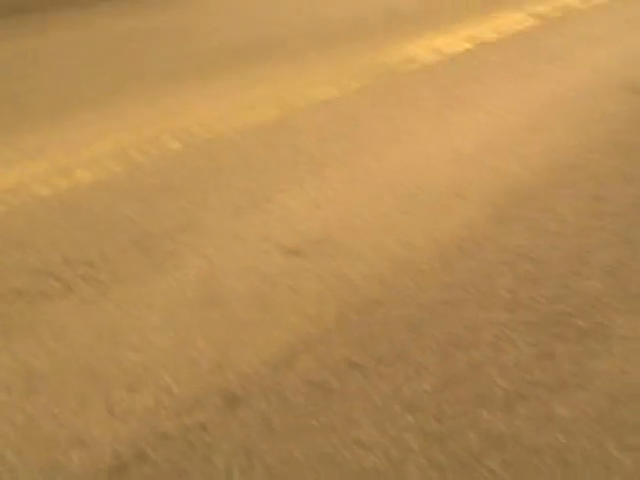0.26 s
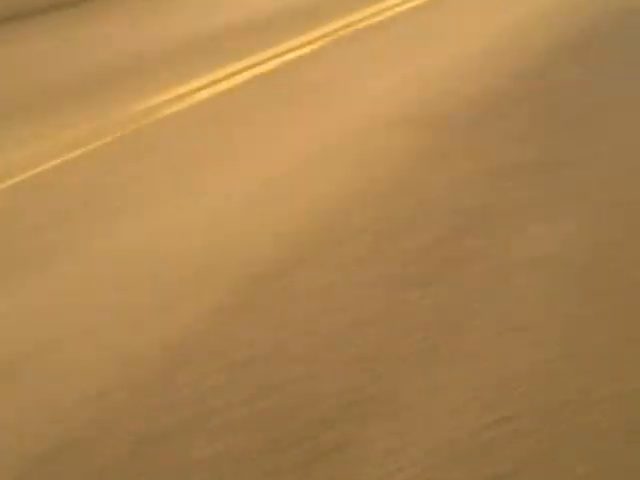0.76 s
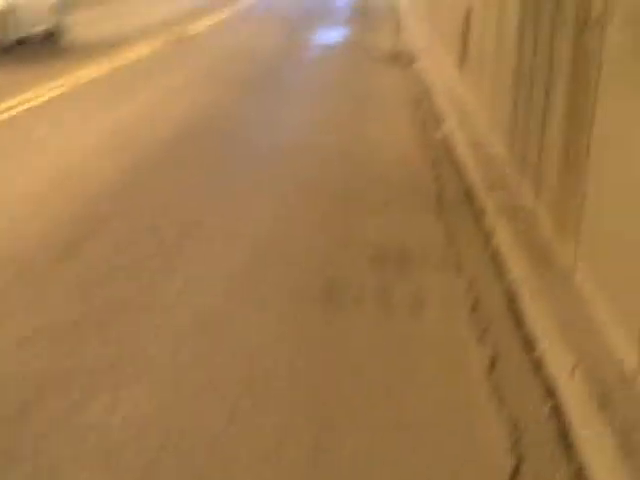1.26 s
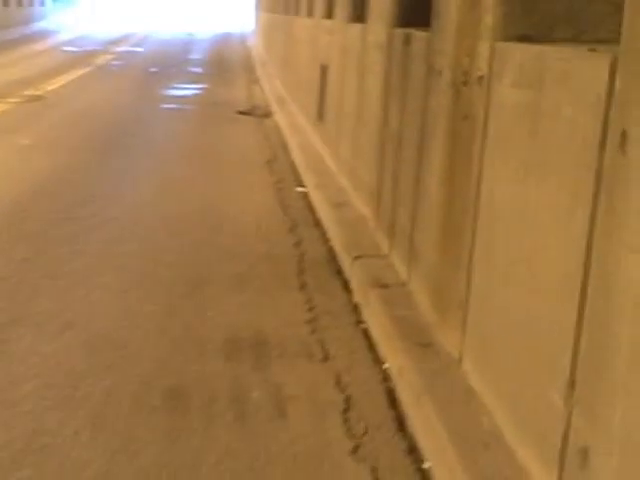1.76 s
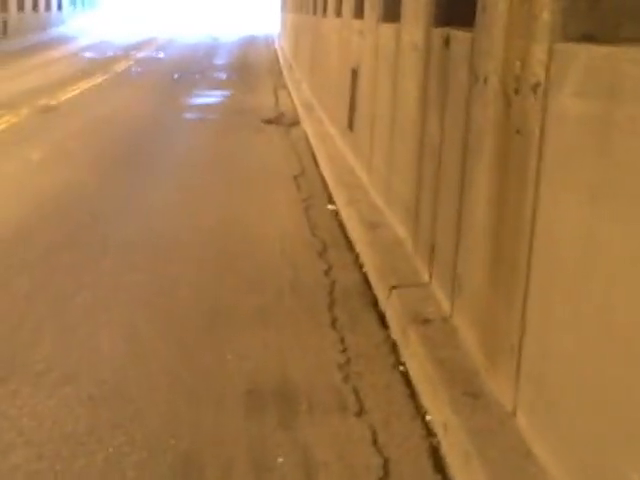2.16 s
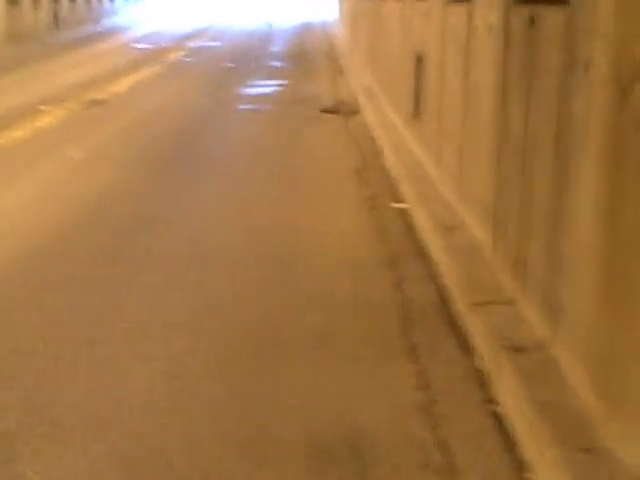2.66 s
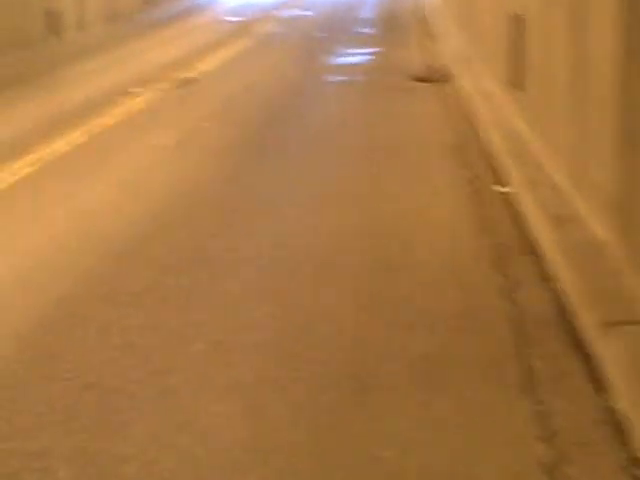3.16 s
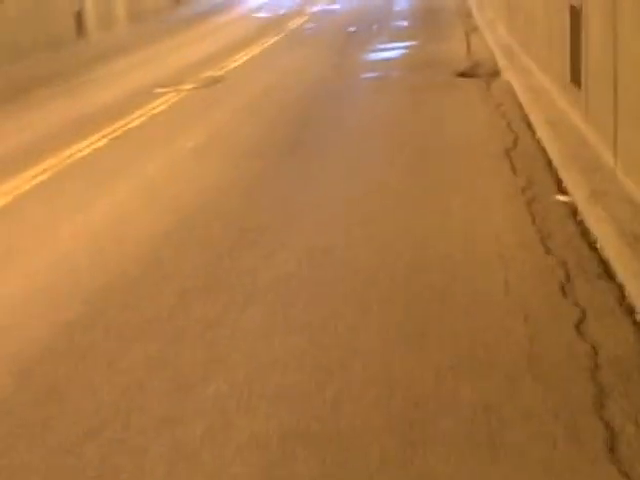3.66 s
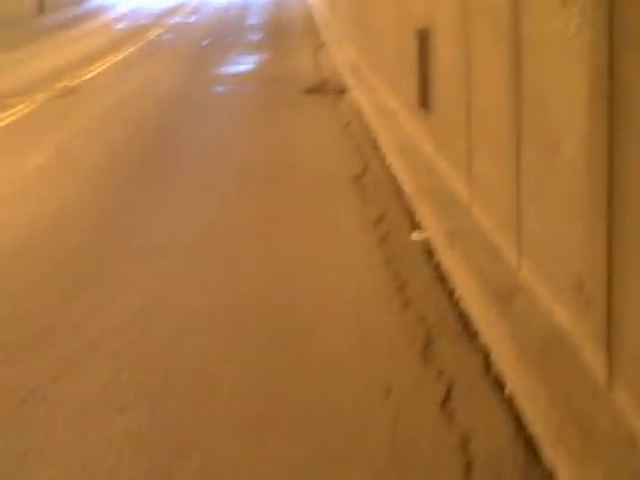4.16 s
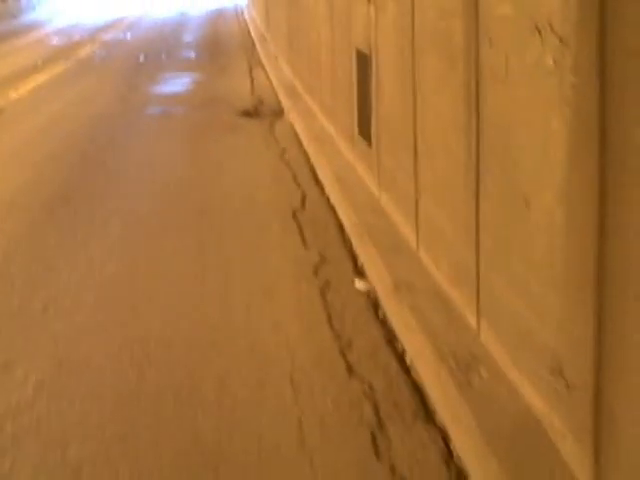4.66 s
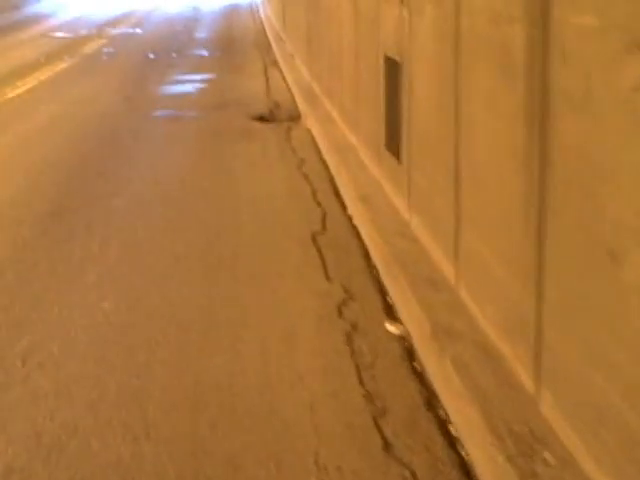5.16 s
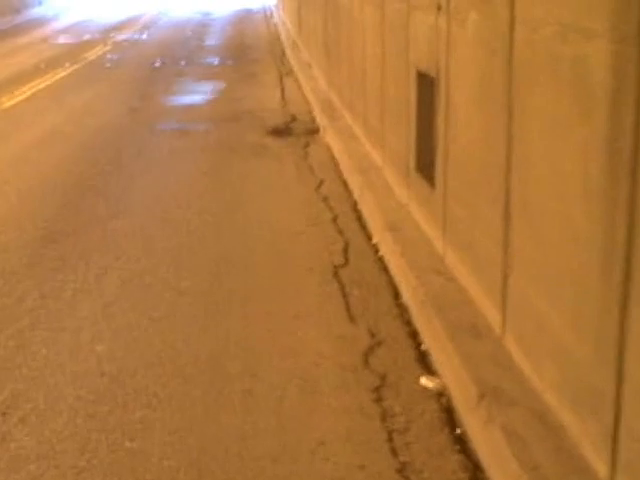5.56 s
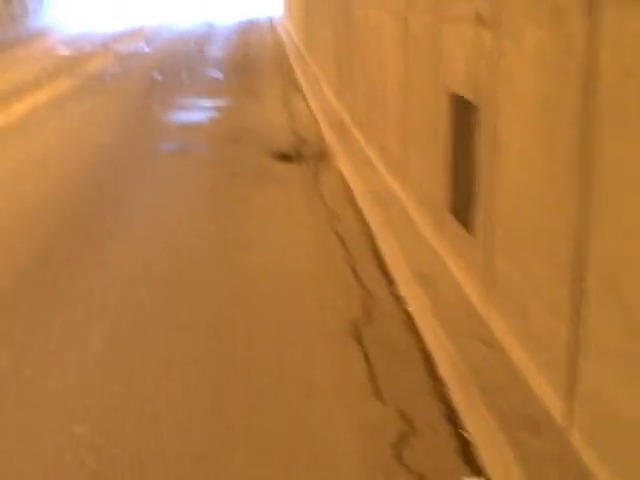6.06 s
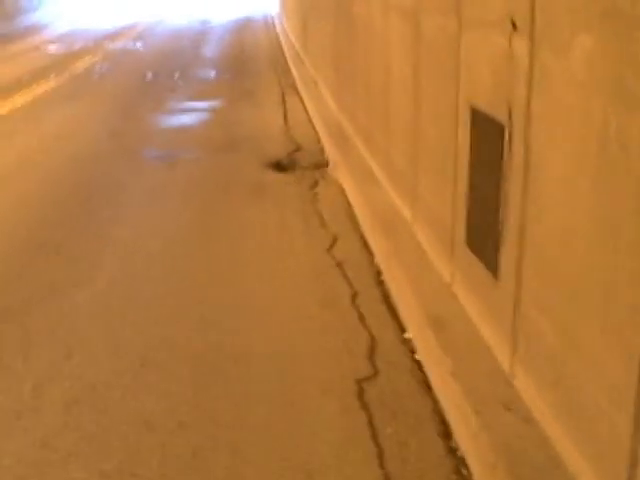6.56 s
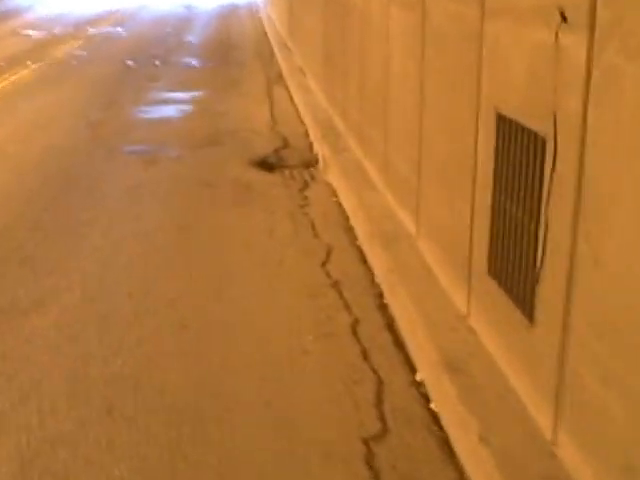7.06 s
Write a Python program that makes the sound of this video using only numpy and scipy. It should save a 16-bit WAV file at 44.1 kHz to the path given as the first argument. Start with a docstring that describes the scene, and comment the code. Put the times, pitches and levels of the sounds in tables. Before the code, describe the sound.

Continuous road traffic heard from the edge of a tunnel lane by a small handheld camera. Broad tyre noise with a bright hiss peaks early, over throbbing low engines and a booming bore. It softens through the middle, with tiny close clicks and a barely audible high whine, then builds again as another vehicle draws near.

```python
"""Tyres roar and engines rumble, blurred by echo: traffic in a concrete tunnel, heard from the kerb by a camera.
A car hisses past at about 2 s, the rush eases, and more traffic draws near; a few dry ticks sound close by.
Tyres are shaped noise that swells as traffic passes, plus bands of noise around moving pitches.
Engines are wavering harmonics over noise; an exhaust drone and the tunnel's deep boom throb; the camera whines."""
import sys
import numpy as np
from scipy import signal
from scipy.fft import rfft, irfft
from scipy.io import wavfile

SR = 44100
rng = np.random.default_rng(int(sys.argv[2]) if len(sys.argv) > 2 else 0)


def store_wav(level_fs):
    """Save 16-bit WAV to argv[1]."""
    pcm = np.round(np.clip(np.atleast_2d(level_fs), -1, 1) * 32767)
    wavfile.write(sys.argv[1], SR, pcm.T.astype(np.int16))


N = 321840
TIME = np.arange(N) / SR  # s
FREQ = np.maximum(np.fft.rfftfreq(N, 1 / SR), 1)  # Hz, kept off zero for the logarithms


def undb(db):
    """Decibels to gain."""
    return 10 ** (np.asarray(db) / 20)


def unit(x):
    """Scale to an rms of one."""
    return x / np.sqrt(np.mean(x ** 2))


def noise():
    """White noise."""
    return rng.standard_normal(N)


def tone(hz):
    """Phase in radians of a moving pitch."""
    return 2 * np.pi * np.cumsum(hz) / SR


def curves(table):
    """Each column after the first, joined by straight lines in time."""
    s, *columns = np.transpose(table)
    return [np.interp(TIME, s, column) for column in columns]


def colour(x, points):
    """Filter by (Hz, relative dB) points, straight on a log frequency axis, to unit rms."""
    hz, db = np.transpose(points)
    gain_db = np.interp(np.log(FREQ), np.log(hz), db)
    return unit(irfft(rfft(x) * undb(gain_db), N))


def resonate(x, hz, width_hz):
    """One resonance, gain one at its centre."""
    detuning = (FREQ ** 2 - hz ** 2) / (FREQ * width_hz)
    return irfft(rfft(x) / (1 + 1j * detuning), N)


def walk(rate_hz):
    """Smooth random drift of unit rms, its spectrum a Gaussian falling from zero."""
    moving_hz = FREQ[FREQ < 3 * rate_hz]
    real, imag = rng.standard_normal((4096, 2)).T
    size = min(len(moving_hz), len(real))
    fall = np.exp(-(moving_hz[:size] / rate_hz) ** 2)
    return unit(irfft((real + 1j * imag)[:size] * fall, N))


def impacts(per_s, spread_db):
    """Random tiny impacts, a few much harder than the rest."""
    size = undb(spread_db * np.minimum(rng.exponential(size=N), 5))
    hits = rng.random(N) < per_s / SR
    return unit(hits * size * noise())


def hum(hz, spread_hz):
    """A note smeared into a band around a moving pitch, as from many wheels at once."""
    phase = tone(hz)
    return unit(walk(spread_hz) * np.cos(phase) + walk(spread_hz) * np.sin(phase))


# Camera whine. Each row: pitch in Hz, level in dB.
WHINE_TONES = [(7640, -64), (7598, -70)]


def whine():
    """Thin, slightly unsteady sine tones of the camera."""
    waver_hz, waver_rate_hz = 4.5, 17
    out = np.zeros(N)
    for hz, db in WHINE_TONES:
        out += undb(db) * unit(np.sin(tone(hz + waver_hz * walk(waver_rate_hz))))
    return out


# Close ticks. Each row: start in s, level in dB, snap pitch in Hz, knock against snap in dB, decay in s.
TICK_EVENTS = [(3.1035, -26.5, 6300, 1, .0024), (3.107, -33, 6200, 3, .002), (3.1785, -30.5, 6900, 1, .003),
               (3.1815, -35, 6700, 4, .002), (4.839, -37, 7000, -6, .002), (4.856, -38, 6350, 0, .003),
               (5.402, -30, 6400, -12, .0028), (5.667, -37, 6300, 2, .01), (6.178, -37, 6600, -6, .009),
               (6.417, -30.5, 6500, -3, .003)]
TICK_WIDTH_HZ = 1400


def ticks():
    """Dry ticks near the microphone: a resonant noise snap over a lower knock, decaying in milliseconds."""
    out = np.zeros(N)
    crack = colour(noise(), [(3000, -6), (6000, 3), (7200, -1.5), (8000, -14.5)])
    knock = colour(noise(), [(1200, -20.5), (3000, -2), (4300, 6), (5500, -1.5), (7500, -18)])
    for s, db, hz, knock_db, decay_s in TICK_EVENTS:
        decay = np.exp(-np.minimum(np.abs(TIME - s) / decay_s, 20))
        snap = unit(resonate(crack, hz, TICK_WIDTH_HZ))
        out += (TIME >= s) * decay * undb(db) * (snap + undb(knock_db) * knock)
    return out


def motor(hz):
    """Harmonics 2 to 8 of one car's engine; each fades in and out among the wall reflections."""
    phase = tone(hz * (1 + .05 * walk(0.81) + 0.01544 * walk(9.6)))
    return unit(sum(walk(3.3) * np.sin(k * phase) for k in range(2, 9)))


# Engine rumble, surging and sagging as cars roll by.
# Each row: time in s, level of the deep part in dB, level of the engine notes and their rumble in dB.
RUMBLE_LEVEL = [(0, -29, -24.5), (.35, -27.5, -22), (.67, -27.5, -20.5), (1.1, -28, -23.3),
                (1.55, -27, -21.5), (2.15, -29, -20), (2.5, -25.5, -21), (2.9, -26, -23), (3.7, -26, -24),
                (4.12, -31, -22), (4.45, -26, -27), (4.75, -27.5, -24.5), (5.3, -25, -27), (5.58, -35, -26),
                (5.9, -29, -26), (6.22, -26.5, -26.5), (6.48, -24, -24.5), (7.3, -23.5, -21.5)]
# Spectra of the engine rumble and the deep part. Each row: frequency in Hz, relative level in dB.
RUMBLE_SPECTRUM = [(60, -32.5), (105, -7), (130, 1.5), (160, 0.5), (190, -0.5), (255, -3.5), (290, -6.5),
                   (400, -14), (900, -73)]
DEEP_SPECTRUM = [(10, -9), (24, -7), (38, -5.5), (55, -3.5), (72, -1.5), (100, -1), (118, -7.5), (170, -24),
                 (400, -64)]


def engines(count=3):
    """A few cars' engine notes over the diffuse rumble of the rest, and deep noise that fills the bore."""
    deep_db, engine_db = curves(RUMBLE_LEVEL)
    notes_db, waver_db, waver_rate_hz = -3, .8, 14
    notes = colour(sum(motor(hz) for hz in rng.uniform(32, 52, count)), RUMBLE_SPECTRUM)
    rumble = colour(noise(), RUMBLE_SPECTRUM)
    deep = colour(noise(), DEEP_SPECTRUM)
    mixed = unit(rumble + undb(notes_db) * notes) * undb(waver_db * walk(waver_rate_hz))
    return undb(engine_db) * mixed + undb(deep_db) * deep


# Short low sine tones. Each row: centre in s, half-width to 1/e in s, pitch in Hz, level in dB.
LOW_TONES = [(1.35, .05, 138, -25), (2.01, 0.065, 193, -21), (2.12, .06, 126.7, -22.5),
             (2.17, .05, 189.6, -21.5), (2.37, 0.045, 108, -24), (7.12, .07, 162, -22.5)]


def low_tones():
    """Short low sine tones under Gaussian envelopes."""
    out = np.zeros(N)
    for s, width_s, hz, db in LOW_TONES:
        envelope = np.exp(-((TIME - s) / width_s) ** 2)
        out += undb(db) * envelope * unit(np.sin(2 * np.pi * (hz * TIME + rng.random())))
    return out


def throbbing_note(hz, level_db, overtone_db, waver_hz, flutter_db):
    """A low note with overtones 2 to 4, wavering in pitch and fluttering in level."""
    phase = tone(hz + waver_hz * walk(7.45))
    overtones = sum(walk(2.3) * np.sin(k * phase) for k in range(2, 5))
    note = np.sin(phase) * undb(flutter_db * np.tanh(walk(6.5)))
    return unit(note + undb(overtone_db) * overtones) * undb(level_db)


# Drone of a faster engine. Each row: time in s, level in dB.
DRONE_LEVEL = [(0, -33), (.45, -31.5), (.7, -38), (.95, -26), (1.65, -29), (2.1, -30.5), (2.65, -43),
               (2.9, -30), (3.35, -29), (4.1, -28.5), (4.25, -40), (4.6, -30), (4.92, -26), (5.08, -32),
               (5.4, -32), (5.7, -42), (6.5, -35), (7.2, -29)]
DRONE_HZ = 65.4


def drone():
    """Exhaust note at a steady mean firing rate."""
    level_db, = curves(DRONE_LEVEL)
    return throbbing_note(DRONE_HZ, level_db, overtone_db=-14.0, waver_hz=5, flutter_db=4.5)


# Deep boom of the tunnel near 40 Hz, stirred by engines. Each row: time in s, level in dB.
BOOM_THROB = [(0, -20), (.11, -23), (.19, -36), (.25, -25), (.35, -20), (.41, -37), (.48, -24), (.6, -18),
              (.74, -27), (.84, -44), (.93, -23), (1.08, -34), (1.2, -20.5), (1.29, -42), (1.37, -21),
              (1.62, -23), (1.88, -18.5), (1.99, -34), (2.36, -38), (2.5, -23), (2.62, -32), (2.78, -36),
              (2.86, -19), (2.97, -21), (3.1, -24), (3.16, -30), (3.25, -22), (3.48, -22), (3.66, -37),
              (3.83, -25), (4, -35), (4.15, -21.5), (4.26, -35), (4.42, -34), (4.62, -45), (4.8, -36),
              (5, -42), (5.14, -32), (5.25, -42), (5.38, -31), (5.55, -39), (5.95, -31), (6.15, -40),
              (6.4, -33), (6.7, -35), (7.3, -31)]
BOOM_MID_HZ = 40.46
EASE_SHARE, EASE_S, EASE_GLIDE_S = 0.024, 2.4, .3  # share is to each side of the middle


def boom():
    """Deep boom of the tunnel near 40 Hz, stirred by engines, its pitch easing slightly down."""
    level_db, = curves(BOOM_THROB)
    glide = np.tanh((TIME - EASE_S) / EASE_GLIDE_S)
    boom_hz = BOOM_MID_HZ * (1 - EASE_SHARE * glide)
    return throbbing_note(boom_hz, level_db, overtone_db=-16.0, waver_hz=1.11, flutter_db=2.0)


# Swells of passing traffic; one car may take two rows. Each row: peak in s before the carry delay,
# half-power half-width in s before the carry stretch, then tyre roar, bright roar, hiss and sizzle in dB.
PASS_SWELLS = [(.75, 0.44, -27.5, -31, -36, -44.5), (1.71, 0.9, -25, -26.5, -27.5, -33),
               (2.06, 0.31, -24, -28.5, -39.5, -37.5), (2.85, 0.78, -27, -35, -46, -47.5),
               (4.25, 0.51, -31, -35, -51.5, -60), (4.8, 0.32, -35.5, -42, -38.5, -44.5),
               (6.22, .13, -28, -40.5, -49, -39.5), (7.2, 0.38, -23.5, -30.5, -34, -39)]


def traffic(carry, part):
    """Gain of one part of the traffic: each swell rises and falls, and powers add to the far wash."""
    rise, fall, delay_s, far_db = carry
    power = undb(far_db) ** 2
    for s, width_s, *part_db in PASS_SWELLS:
        since_s = TIME - s - delay_s
        stretch = np.where(since_s < 0, rise, fall)
        along = since_s / (width_s * stretch)
        power = power + undb(part_db[part]) ** 2 / (1 + along ** 2)
    return np.sqrt(power)


# Spectra of hiss and grit sizzle. Each row: frequency in Hz, relative level in dB.
HISS_SPECTRUM = [(800, -8), (1700, 2.5), (2600, 0.8), (3500, 1.5), (5000, 0), (6500, -3), (7400, -11.5),
                 (8000, -15.5)]
SIZZLE_SPECTRUM = [(3500, -22), (5200, -4), (6100, 1), (6700, 0), (7400, -5), (8000, -15.5)]
# Carry along the bore. The row: stretch of the rise, stretch of the fall, delay in s, far wash in dB.
HISS_ALONG = (0.76, 0.34, 0.37, -40)
SIZZLE_ALONG = (0.5, 0.43, 0, -49.5)
GRIT_FLICKER_DB, GRIT_FLICKER_HZ = 1.0, 30
HISS_FLICKER_DB, HISS_FLICKER_HZ = 0.24, 43


def tread_hiss():
    """Air squeezed from the tread, with a fine sizzle of grit on top; both fall faster than they rise."""
    air = colour(noise(), HISS_SPECTRUM)
    grit = colour(noise() + 0.65 * impacts(per_s=2800, spread_db=3.5), SIZZLE_SPECTRUM)
    grit = grit * undb(GRIT_FLICKER_DB * walk(GRIT_FLICKER_HZ))
    passing = traffic(HISS_ALONG, part=2) * air + traffic(SIZZLE_ALONG, part=3) * grit
    return passing * undb(HISS_FLICKER_DB * walk(HISS_FLICKER_HZ))


FLUTTER_DB, FLUTTER_HZ = 1.1, 28


def flutter(x, count=9):
    """Shifting wall reflections make each half-octave band of a sound waver on its own."""
    place = np.clip(2 * np.log2(FREQ / 500), 0, count - 1)
    spectrum = rfft(x)
    out = np.zeros(N)
    for k in range(count):
        band = irfft(spectrum * np.maximum(1 - np.abs(place - k), 0), N)
        out += band * undb(FLUTTER_DB * walk(FLUTTER_HZ))
    return unit(out)


# Spectra of tyre roar and bright roar. Each row: frequency in Hz, relative level in dB.
ROAR_SPECTRUM = [(150, -26), (310, -1.5), (390, -2), (480, -1), (600, -3.5), (780, -2.5), (1050, -8.5),
                 (1400, -13), (2000, -34), (5000, -66)]
BRIGHT_SPECTRUM = [(500, -12.5), (900, -2), (1130, 0), (1400, -5), (1700, -6.5), (2100, -10), (3000, -17.5),
                   (5000, -27), (10000, -56.5)]
# Carry along the bore. The row: stretch of the rise, stretch of the fall, delay in s, far wash in dB.
ROAR_ALONG = (1.1, 1.3, -0.05, -31.5)
BRIGHT_ALONG = (2.5, 1.0, 0.17, -36)
# Tread-block hum, its pitch following traffic speed; hollow ring of the air inside the tyres;
# upper edge of the roar, singing out as cars draw away. Each row: time in s, pitch in Hz, level in dB.
TREAD_HUM = [(0, 851, -29.5), (.5, 855, -31), (.75, 862.3, -30), (1.3, 869.7, -31), (2.03, 901.6, -25.5),
             (2.4, 901, -28), (3.3, 928, -30.5), (4.5, 899.3, -32), (5.9, 859, -36.5), (6.35, 820, -29.5),
             (6.7, 820, -29), (7.1, 811, -26), (7.3, 789, -31.5)]
CAVITY_RING = [(0, 255, -41), (.2, 250, -23.5), (.48, 240, -31.5), (.78, 241.3, -23.5), (1.2, 234.7, -27.5),
               (1.55, 239.9, -22.5), (1.85, 235.5, -27), (2.1, 240.8, -24.5), (2.6, 210.7, -30),
               (3.2, 222.3, -26.5), (3.72, 215.4, -42), (3.95, 200.3, -28), (4.5, 209.6, -31.5),
               (5.15, 244.8, -32), (5.7, 237.2, -32.5), (6.22, 229, -37.5), (6.45, 233.4, -26.5),
               (7.3, 215, -41)]
SING_BAND = [(0, 1142, -43), (1.4, 1196, -39), (2, 1282, -36), (2.42, 1272, -29), (2.65, 1260, -33),
             (2.88, 1258, -29.5), (3.2, 1261, -34), (3.8, 1253, -38), (4.25, 1241, -34), (5.3, 1230, -40.5),
             (7.3, 1298, -42)]
TREAD_SPREAD_HZ, CAVITY_SPREAD_HZ, SING_SPREAD_HZ = 220, 46.5, 266


def tyres():
    """Tyre roar diffused by the walls, with tread-block hum, singing upper edge and hollow cavity ring."""
    body = colour(noise(), ROAR_SPECTRUM) * undb(0.38 * walk(6.8))
    bright = flutter(colour(noise(), BRIGHT_SPECTRUM))
    out = traffic(ROAR_ALONG, part=0) * body + traffic(BRIGHT_ALONG, part=1) * bright
    bands = [(TREAD_HUM, TREAD_SPREAD_HZ), (SING_BAND, SING_SPREAD_HZ), (CAVITY_RING, CAVITY_SPREAD_HZ)]
    for table, spread_hz in bands:
        hz, db = curves(table)
        out += hum(hz, spread_hz) * undb(db)
    return out


def scene():
    """All the traffic and the small close sounds at one microphone."""
    close = whine() + ticks()
    low = engines() + low_tones() + drone() + boom()
    return (close + low + tread_hiss() + tyres())[None]


# Leak of the mirror image above half the camera's sample rate. Each row: frequency in Hz, gain in dB.
MIRROR_LEAK = [(8000, 0.5), (8550, -8.4), (8950, -14.5), (9350, -21.3), (9750, -30.5), (10050, -38)]
MIC_HZ, MIC_WIDTH_HZ, MIC_DB = 6210, 1060, 4
HALF_RATE_HZ, TOP_HZ = 8000, 10050


def record(dry):
    """The microphone port rings; the camera's low sample rate mirrors treble upward; the top is cut off."""
    ring = resonate(dry[0], MIC_HZ, MIC_WIDTH_HZ)
    coloured = dry[0] + (undb(MIC_DB) - 1) * ring
    kept = irfft(rfft(coloured) * (FREQ < HALF_RATE_HZ), N)
    # A carrier at the full sample rate folds the spectrum about half of it.
    mirror = rfft(kept * 2 * np.cos(2 * np.pi * 2 * HALF_RATE_HZ * TIME))
    leak_db = np.interp(FREQ, *np.transpose(MIRROR_LEAK))
    leak = irfft(mirror * undb(leak_db), N)
    top_cut = signal.ellip(10, .2, 80, TOP_HZ, fs=SR, output="sos")
    return signal.sosfilt(top_cut, kept + leak)[None]


dry = scene()
out = record(dry)
store_wav(out)
```